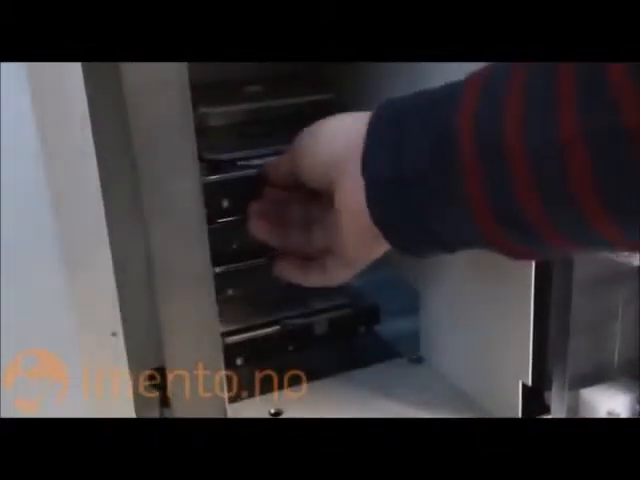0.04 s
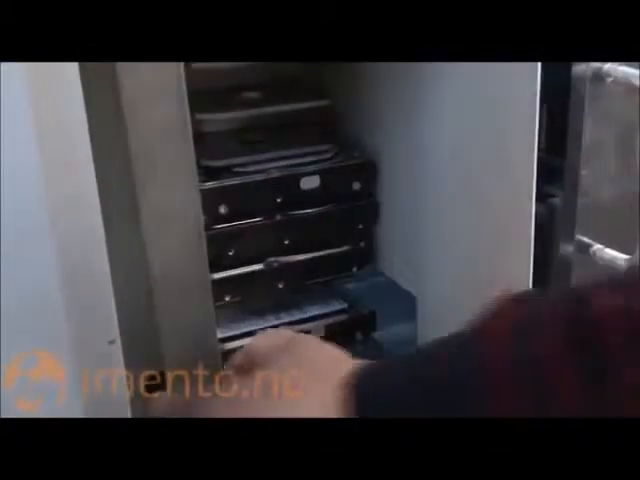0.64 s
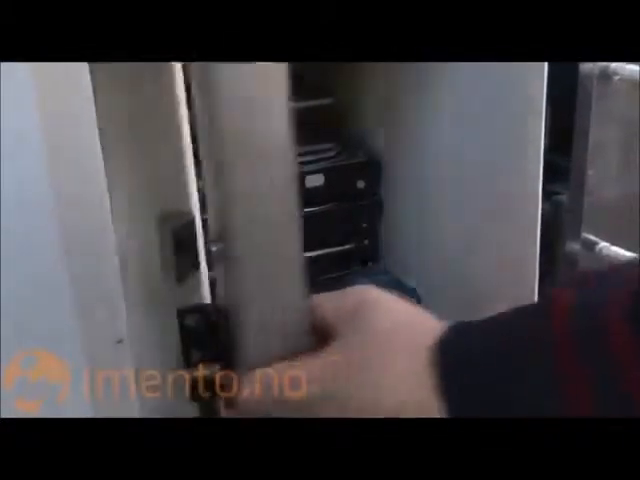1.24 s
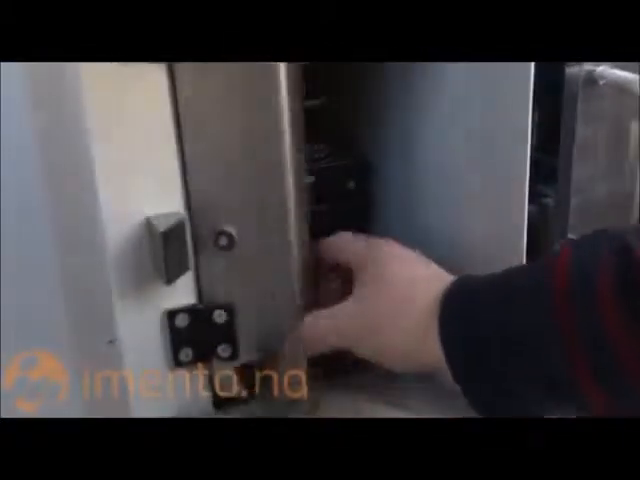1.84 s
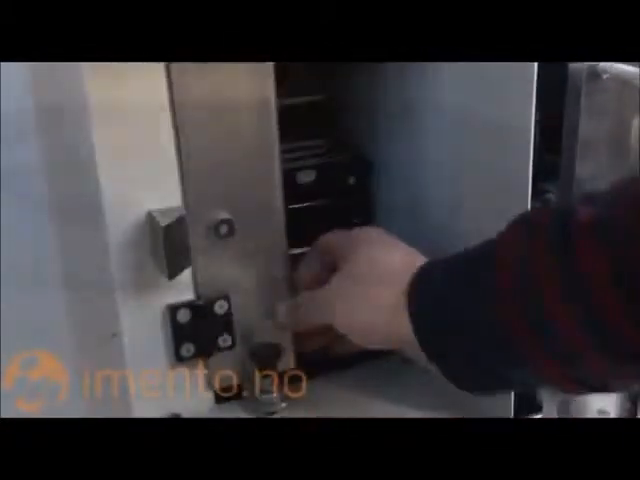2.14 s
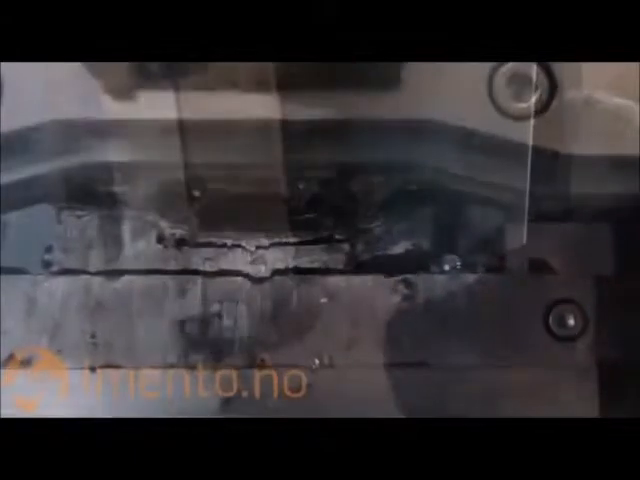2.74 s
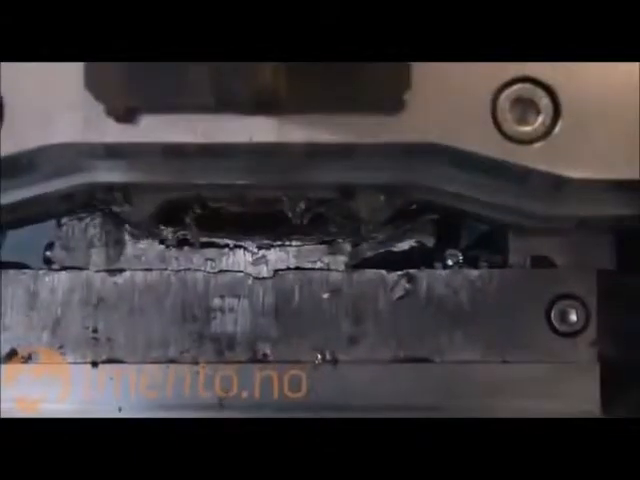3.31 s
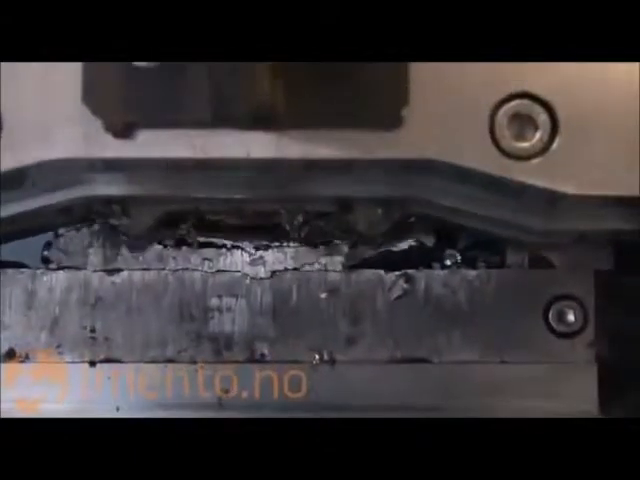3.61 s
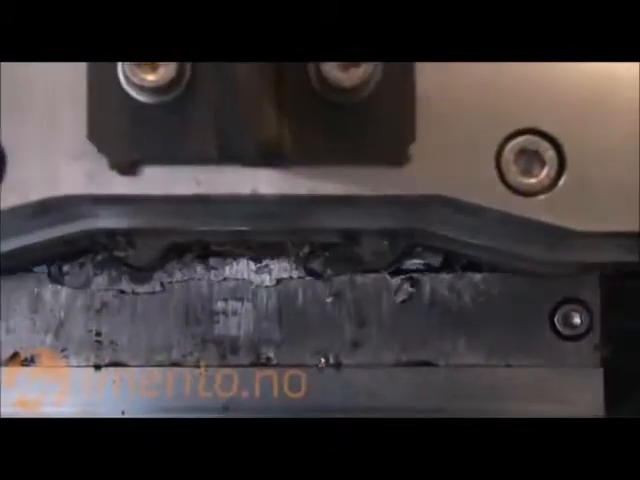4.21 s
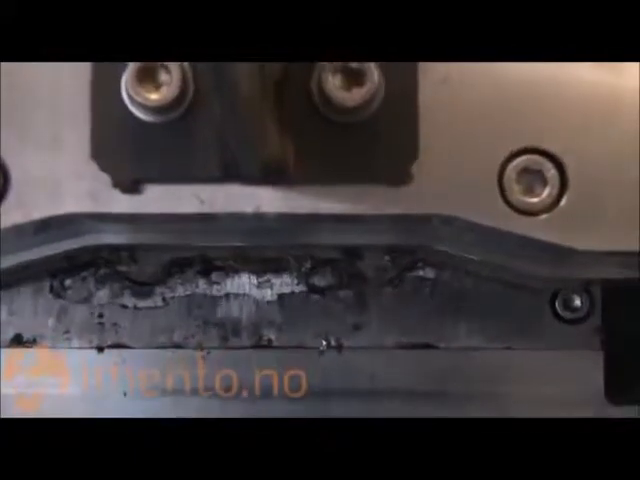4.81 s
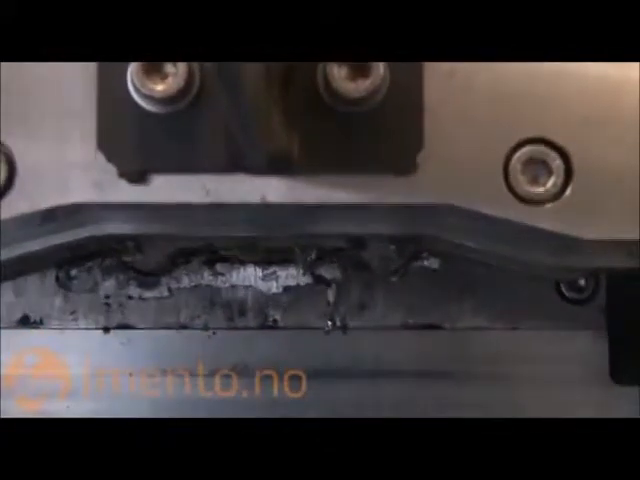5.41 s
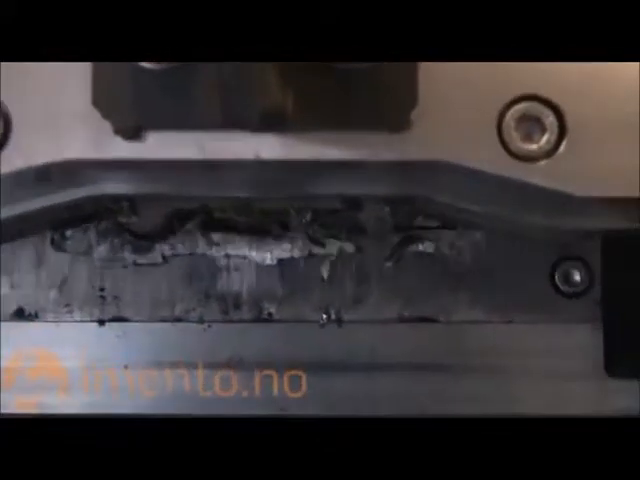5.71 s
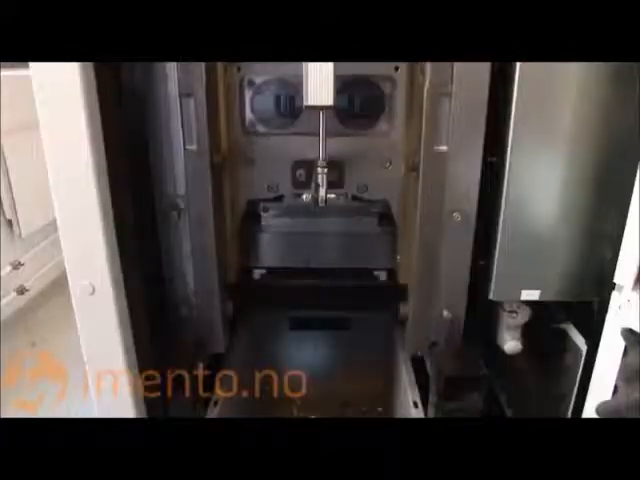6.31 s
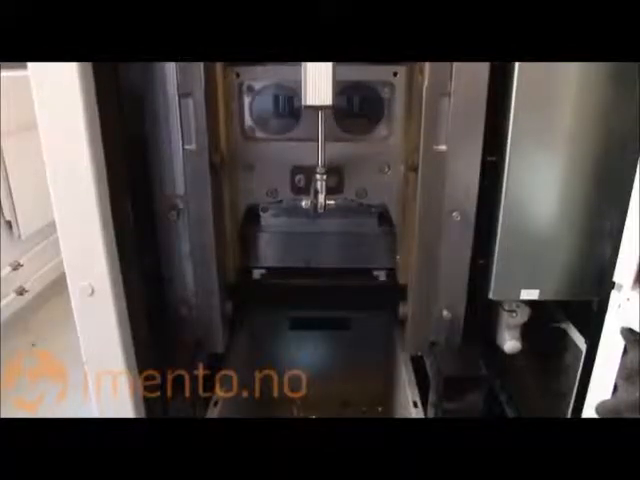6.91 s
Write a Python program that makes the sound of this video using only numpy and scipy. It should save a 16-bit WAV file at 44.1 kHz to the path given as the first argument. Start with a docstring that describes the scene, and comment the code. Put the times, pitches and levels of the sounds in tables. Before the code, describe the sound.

A metal door shuts over fan hum, then a hydraulic press whines as it crushes a hard drive with sharp cracks and a clatter.

```python
"""At a hard-drive crusher: drives are stacked in its steel cabinet and the door is shut over mains hum
and a fan; this fades out. Then, close by, the hydraulic pump whines at multiples of its piston rate and
sags under load as the ram crushes a drive. Castings crack, chips snap off, the ram bottoms out and the
wreck falls with a clatter. Impacts are decaying noise bursts, some with ringing modes."""
import sys
import numpy as np
from scipy import signal
from scipy.fft import rfft, irfft, next_fast_len
from scipy.io import wavfile

SR = 44100
rng = np.random.default_rng(int(sys.argv[2]) if len(sys.argv) > 2 else 0)


def transcribe(u):
    """Save the signal u as a 16-bit wav file named by the first command-line argument.

    u: samples, shape (n,) or (channels, n), limited to [-1, 1]; the rate is SR.
    q: integer samples, one column per channel.
    """
    v = np.clip(np.atleast_2d(u).T, -1, 1)
    q = np.round(v * 32767).astype(np.int16)
    wavfile.write(sys.argv[1], SR, q)


N = 306495
TIME = np.arange(N) / SR
RING_TIME = TIME[:SR // 2]

# Levels are relative within each table.
# idle hum: f/Hz, level/dB
HUM_TONES = [(199, -74.5), (500, -73.5), (599.6, -60.5), (700, -69.5), (1599, -72)]
# fan noise: f/Hz, density/dB
FAN_SPECTRUM = [(18, -78), (30, -36), (92, -18), (167, -17.5), (228, -7), (267, -13.5), (524, -14),
                (597, -11.5), (645, -18), (698, -9.5), (754, -18.5), (1600, -16.5), (1780, -19.5),
                (6700, -38.5), (15000, -66.5)]
# knocks of drives and door: t/s, level/dB, centre f/Hz, fall/(dB/octave), t60/s
HANDLING_KNOCKS = [(.001, -44.5, 854, 6.5, 0.54), (.026, -33.5, 1054, 15, 0.13),
                   (.078, -20.5, 1990, 11, 0.031), (1.19, -29, 6670, 8, 0.085), (2.073, -53, 4000, -2, .12),
                   (2.366, -32, 1940, 11, 0.17), (2.386, -29, 2430, 8.5, 0.074),
                   (2.466, -51, 1000, 3.5, .2)]
# modes of drive casing, latch and door panel: f/Hz, level/dB, t60/s
CASING_MODES = [(374, -8.5, 0.23), (750, -4.5, 0.24), (1518, -7, .3), (2003, -9, .2), (2263, -8.5, 0.42),
                (2778, -9.5, 0.72), (3287, -4, 0.25), (3390, -8, 0.21), (5340, -25.5, 0.44),
                (5658, -25, 0.19), (7050, -5.5, 0.071), (7240, -11, 0.066)]
LATCH_MODES = [(977, 2, 0.046), (1143, 0, 0.19), (1840, -10.5, 0.24), (2950, -21, .14), (4240, -4, 0.13),
               (5800, -4, .13), (6380, 12, 0.045), (6800, -2, 0.13), (7260, -1.5, 0.13),
               (8000, -0.5, 0.087)]
DOOR_MODES = [(358, -7.5, 0.37), (568, -0.5, 1), (783, -7, 0.54), (1455, 7, 0.19), (1500, -7.5, 0.65),
              (1770, -12, 0.59), (4180, -0.5, 0.2), (5270, -15, 0.4), (6450, -5.5, 0.26)]
# cabinet reverberation: f/Hz, t60/s
CABINET_DECAY = [(150, 0.18), (400, 0.71), (1000, 0.49), (2700, 0.28), (7000, 0.12), (14000, 0.062)]
# sleeve strokes: middle t/s, length/s, level/dB
SLEEVE_STROKES = [(.76, 0.2, -89), (1.424, 0.26, -74), (1.76, 0.28, -76), (2.054, 0.13, -73),
                  (2.35, 0.36, -68), (2.72, 0.12, -81)]
# cloth noise: f/Hz, density/dB
CLOTH_SPECTRUM = [(500, -28.5), (3500, -3.0), (6500, -1.5), (10000, -14.0), (15000, -19.0)]
# ram slips, bites, presses on, bottoms out, is released: t/s, load/0-1
RAM_LOAD = [(3.66, 0.27), (3.72, 0.07), (3.85, 0), (3.99, 0.35), (4.1, 0.64), (4.2, 0.29), (4.5, 0.28),
            (5.62, .22), (5.73, 0.89), (5.91, 0.99), (6.05, 0)]
# pressure ripple: piston-rate multiple, no-load level/dB, added part at full load/dB, load exponent
PRESSURE_RIPPLE = [(1, -63.5, -42, 0.52), (2, -51.5, -48.5, 4.7), (4, -64, -40, 0.94), (5, -56.5, -53, 1.5)]
# swells of single ripple orders: t/s, length/s, piston-rate multiple, level/dB
RIPPLE_SWELLS = [(3.454, .28, 2, -42), (3.9, 0.95, 1, -48), (3.904, 0.38, 2, -45.5), (6.44, 0.34, 1, -45.5),
                 (6.569, .18, 5, -44), (6.559, .17, 4, -48.5), (6.762, .25, 1, -52.5)]
# pump whine: piston-rate multiple, pressing level/dB, full-load level/dB, return target level/dB
WHINE_ORDERS = [(3, -6.5, -7, -11), (6, -2, -9.5, -6.5), (7, -6, -2.5, -2), (8, -6.5, -7, -3),
                (9, -1.5, 1.5, -4), (10, -9.5, -12, -11), (11, -14.5, -8, -9), (12, -18, -15, -21),
                (13, -21.5, -20, -43), (14, -24, -20, -47), (15, -31, -16, -48), (19, -43, -27, -41),
                (20, -25.5, -19, -22), (21, -33, -27, -29), (22, -42, -26, -34), (23, -33, -27, -16),
                (25, -49, -15, -5), (27, -46, -29, -20), (28, -24, -31, -14), (29, -33, -28, -27)]
# oil flow noise: f/Hz, density/dB
OIL_SPECTRUM = [(25, -24), (60, -14), (130, -1), (330, 4.5), (600, 0), (1100, -4.5), (1600, 0), (2200, -5),
                (3200, -1), (3800, -8.5), (5400, -11), (6100, -6.5), (7200, -11), (8500, -9), (9800, -17.5),
                (13000, -26), (15000, -37)]
# motor tones, many spaced by twice the mains frequency about the switching rate: f/Hz, level/dB
MOTOR_TONES = [(797, -58), (2536, -60), (3149, -57), (5701, -64.5), (5799, -61.5), (5900, -58.5),
               (6100, -65.5), (6201, -56), (6299, -73), (6401, -72), (6799, -83), (8032, -70),
               (8403, -71.5), (8624, -71)]
# frame rumble: f/Hz, density/dB
FRAME_SPECTRUM = [(40, -29), (100, -6), (138, 8.5), (170, 1.5), (230, 0), (280, -16.5), (345, 8), (450, -9),
                  (750, -13.5), (1500, -10.5), (4000, -39)]
# jolts to frame and chute: t/s, level/dB, t60/s
FRAME_JOLTS = [(3.7, -42.5, 0.5), (3.89, -45.5, 1.6), (4.853, -24.5, 0.16), (5.008, -29.5, 0.094),
               (5.64, -40.5, 0.57), (5.92, -37.5, 1.8), (6.34, -29, 1.37)]
# cracks, snaps and clanks: t/s, level/dB, centre f/Hz, fall/(dB/octave), t60/s
CRUSH_CRACKS = [(3.696, -29.5, 580, 5.5, 0.24), (3.849, -23.5, 6600, 4.5, 0.047),
                (3.879, -30, 520, 4, 0.32), (3.914, -30, 9000, 16, 0.077), (4.143, -9.5, 1200, 10.5, 0.056),
                (4.439, -17, 12010, 1.5, 0.045), (4.8525, -8, 1650, 9.5, 0.052),
                (4.863, -11.5, 1820, 6, 0.052), (5.008, -18, 1196, 10, 0.057), (5.053, -19, 3700, 7, .05),
                (5.135, -17, 2550, 7, 0.064), (5.21, -28, 3750, 4, 0.036), (5.286, -29.5, 4992, 9.5, 0.064),
                (5.637, -24, 620, 8.5, 0.11), (5.918, -14, 745, 8.5, 0.051), (5.932, -23, 850, 7, 0.24),
                (6.3316, -16, 9000, 0.5, 0.1), (6.351, -8.5, 1000, 2.5, 0.052), (6.361, -6, 970, 5.5, .06),
                (6.416, -24.5, 400, 1.2, 0.1)]
# short modes of the impacts, fragment rings and a low thump: t/s, f/Hz, level/dB, t60/s
IMPACT_MODES = [(4.144, 662, -13.5, 0.059), (4.145, 1800, -17, .035), (4.143, 2746, -20.5, 0.035),
                (4.147, 1198, -13, 0.037), (4.44, 1393, -15, 0.032), (4.443, 1665, -38, 0.21),
                (4.44, 1719, -25, 0.089), (4.442, 1860, -22.5, .05), (4.44, 4160, -24, .04),
                (4.441, 12060, -22, 0.034), (4.853, 197, -19, 0.11), (4.853, 304, -14.5, .07),
                (4.854, 1503, -17, 0.069), (4.854, 468, -20, .11), (4.853, 1970, -15, .045),
                (4.863, 646, -13.5, 0.031), (5.053, 4240, -26, 0.027), (5.637, 976, -30, 0.029),
                (5.917, 664, -14.5, 0.032), (6.332, 2505, -22.5, 0.075), (6.353, 456, -22.5, 0.17),
                (6.353, 940, -19, 0.12), (6.363, 346, -19.5, 0.13), (6.362, 542, -25.5, 0.17),
                (6.818, 1165, -23.5, 0.046), (6.818, 980, -23.5, .03), (6.819, 1238, -33, 0.15)]
# press reverberation: f/Hz, t60/s
PRESS_DECAY = [(150, 0.17), (400, 0.51), (1000, 0.23), (2700, 0.36), (7000, 0.13), (14000, 0.042)]
# left-right likeness: f/Hz, correlation/0-1
STEREO_LIKENESS = [(60, 0.93), (300, 0.95), (800, 0.6), (2500, 0.8), (4500, 0.31), (8000, 1), (12000, 1)]
# balance: f/Hz, left minus right/dB
STEREO_LEAN = [(40, 6), (330, 4), (700, 3), (1300, -1), (4400, -0.2), (12000, 0.5)]
# microphone response: f/Hz, gain/dB
MIC_RESPONSE = [(2700, 0.5), (3300, 1), (3550, -7.5), (4000, -0.5), (4300, 0), (12600, 3), (15000, -14)]

PRESSING_LOAD = 0.18  # ram moving steadily through the drive
REVERSE_S, RETRACT_END_S = 5.9, 6.34  # return stroke


def amp(db):
    """dB to gain."""
    return 10 ** (np.asarray(db) / 20)


def unit(x):
    """Scale to rms 1."""
    return x / np.sqrt(np.mean(x ** 2) + 1e-20)


def read(points, hz):
    """Interpolate over log frequency."""
    f, value = np.transpose(points)
    return np.interp(np.log(hz + 1), np.log(f + 1), value)


def curve(points):
    """Interpolate over time."""
    return np.interp(TIME, *np.transpose(points))


def ramp(start_s, length_s):
    """Linear rise, 0 to 1."""
    return np.clip((TIME - start_s) / length_s, 0, 1)


def decay(t, t60_s, rise_s=0.00034):
    """Quick rise, exponential fall."""
    return (1 - np.exp(-t / rise_s)) * amp(-60 * t / t60_s)


def add(mix, start_s, sound):
    """Mix in a stereo sound."""
    part = mix[:, max(0, round(start_s * SR)):][:, :sound.shape[1]]
    part += sound[:, :part.shape[1]]


def highpass(x, hz):
    """Second-order bass cut."""
    return signal.sosfilt(signal.butter(2, hz, "high", fs=SR, output="sos"), x)


def drift(rate_hz):
    """Slow random motion, rms 1."""
    hz = np.fft.rfftfreq(N, 1 / SR)
    return unit(irfft(rfft(rng.standard_normal(N)) * np.exp(-(hz / rate_hz) ** 2), N))


def noise(spectrum, size=N):
    """Coloured, partly correlated stereo noise, rms 1."""
    hz = np.fft.rfftfreq(next_fast_len(size), 1 / SR)
    mid, side = np.exp(2j * np.pi * rng.random((2, len(hz))))
    likeness = np.clip(read(STEREO_LIKENESS, hz), -1, 1)
    mid, side = mid * np.sqrt(1 + likeness), side * np.sqrt(1 - likeness)
    bins = np.array([mid + side, mid - side]) * amp(read(spectrum, hz))
    return unit(irfft(bins)[:, :size])


def tone(turns, spread_rad=0.81):
    """Sine of rms 1, its phase shifted between channels by spread_rad."""
    lag_rad = spread_rad * rng.choice([-.5, .5]) * np.array([[1], [-1]])
    return np.sqrt(2) * np.sin(2 * np.pi * (turns + rng.random()) + lag_rad)


def idle():
    """Mains hum and cooling fan."""
    hum = sum(amp(db + 0.35 * drift(5)) * tone(hz * TIME) for hz, db in HUM_TONES)
    return hum + amp(-61.5) * noise(FAN_SPECTRUM)


def ring(modes):
    """Sparse modes of struck metal ring out."""
    out = 0
    for hz, db, t60_s in modes:
        spread_rad = np.arccos(np.clip(read(STEREO_LIKENESS, hz), 0, 1))
        out += amp(db) * tone(hz * RING_TIME, spread_rad) * decay(RING_TIME, t60_s)
    return out


def blow(db, centre_hz, fall_db_per_oct, t60_s, round_oct=0.77, damped_above_hz=6800):
    """Dense modes of struck metal: a noise burst with one broad hump."""
    hz = np.geomspace(200, 16000, 30)
    octaves = np.log2(hz / centre_hz)
    hump_db = -fall_db_per_oct * np.hypot(octaves, round_oct) * np.where(octaves < 0, 0.92, 1)
    damping_db = 8.5 * np.maximum(np.log2(hz / damped_above_hz), 0)
    density_db = hump_db - 10 * np.log10(hz) - damping_db
    spectrum = [(45, density_db[0] - 22), *zip(hz, density_db)]
    return amp(db) * noise(spectrum, len(RING_TIME)) * decay(RING_TIME, t60_s, rise_s=0.00082)


def reflections(x, decays, onset_s=0.0064):
    """Diffuse tail; each band dies at its own rate."""
    white = noise([(50, 0.0057), (16000, 0.0009)], SR)
    hz, t, bands = signal.stft(white, SR, nperseg=256)
    tail = signal.istft(bands * amp(-60 * t / read(decays, hz)[:, None]), SR, nperseg=256)[1]
    tail *= np.clip(np.arange(tail.shape[1]) / SR / onset_s, 0, 1) ** 2
    return signal.fftconvolve(x.mean(0)[None], tail / np.linalg.norm(tail[0]), axes=1)[:, :N]


def handling():
    """A drive is set down, the latch clicks, the door shuts."""
    out = np.zeros((2, N))
    for start_s, *knock in HANDLING_KNOCKS:
        add(out, start_s, blow(*knock))
    add(out, 0, ring([(188.0, -45.5, 0.6)]))  # tray booms under the stack
    add(out, .079, amp(-39.5) * ring(CASING_MODES))
    add(out, 1.191, amp(-42.5) * ring(LATCH_MODES))
    add(out, 2.369, amp(-44.5) * ring(DOOR_MODES))
    out = highpass(out, hz=150)
    return out + amp(-10) * reflections(out, CABINET_DECAY)


def sleeve():
    """Cloth brushes the cabinet in short strokes."""
    strokes = sum(amp(db) * np.exp(-(2 * (TIME - middle_s) / length_s) ** 2)
                  for middle_s, length_s, db in SLEEVE_STROKES)
    return (amp(-90) + strokes) * amp(2.5 * drift(30)) * noise(CLOTH_SPECTRUM)


def pump(load, free_hz=299.36, sag_hz=4.4, shaft_hz=26.3):
    """Piston strokes hurry and lag once per shaft turn: a warble. Load slows and steadies them."""
    piston_hz = free_hz - sag_hz * load
    retracting = ramp(REVERSE_S, 0.23) - ramp(RETRACT_END_S, 0.13)
    swing_rad = 0.084 - 0.062 * load + 0.062 * retracting
    shaft_rad = 2 * np.pi * np.cumsum(shaft_hz * piston_hz / free_hz) / SR
    turns = np.cumsum(piston_hz + 0.12 * drift(11.3)) / SR
    turns += swing_rad * np.sin(shaft_rad) / (2 * np.pi)
    return ripple(turns, load) + whine(turns, shaft_rad, load, retracting) + oil(turns, load)


def ripple(turns, load, edge_s=0.028):
    """Low orders of the pressure pulses grow with load; now and then one swells."""
    out = np.zeros((2, N))
    for order, free_db, added_db, exponent in PRESSURE_RIPPLE:
        swells = sum(amp(db) * (ramp(start_s, edge_s) - ramp(start_s + length_s - edge_s, edge_s))
                     for start_s, length_s, multiple, db in RIPPLE_SWELLS if multiple == order)
        gain = amp(free_db) + amp(added_db) * load ** exponent + swells
        out += gain * amp(1.2 * drift(2.5)) * tone(order * turns, spread_rad=0.69)
    return out


def whine(turns, shaft_rad, load, retracting, valve_s=0.11):
    """Piston harmonics throb with the shaft; strain and valve reversal shift their balance."""
    strain = np.maximum(load - PRESSING_LOAD, 0) / (1 - PRESSING_LOAD)
    return_share = 0.62 * ramp(REVERSE_S, valve_s)
    out = np.zeros((2, N))
    for order, press_db, full_db, return_db in WHINE_ORDERS:
        colour_db = press_db + strain * (full_db - press_db) + return_share * (return_db - press_db)
        level_db = -43.5 + 3.5 * retracting + colour_db + drift(4.9)
        throb = 1 + 0.24 * np.cos(shaft_rad + rng.standard_normal())
        out += amp(level_db) * throb * tone(order * turns, spread_rad=0.86)
    return out


def oil(turns, load, free_db=-46, choke_db=-2):
    """Oil hisses, one spurt per stroke; load chokes the flow."""
    level_db = free_db + choke_db * np.minimum(load / PRESSING_LOAD, 1)
    return amp(level_db) * noise(OIL_SPECTRUM) * (1 + 0.12 * np.cos(2 * np.pi * turns))


def motor():
    """Switched current makes the windings sing."""
    waver_turns = 0.018 * drift(5.1)
    return sum(amp(db) * tone(hz * TIME + waver_turns) for hz, db in MOTOR_TONES)


def chips(load, rate_per_s=12):
    """Tiny chips tick at random as the casing yields under load."""
    size_db = np.minimum(3 * rng.exponential(1, N), 7)
    impulses = amp(size_db) * (rng.random(N) < rate_per_s / SR)
    strain = np.clip(load / PRESSING_LOAD, 0, 1)
    tick = blow(-51, centre_hz=6000, fall_db_per_oct=6, t60_s=.035)
    return signal.oaconvolve((impulses * strain)[None], tick, axes=1)[:, :N]


def rumble(floor_db=-55):
    """The frame shakes after each jolt and settles."""
    power = sum((amp(db) * decay(np.maximum(TIME - start_s, 0), t60_s, rise_s=0.01)) ** 2
                for start_s, db, t60_s in FRAME_JOLTS)
    return np.sqrt(power + amp(floor_db) ** 2) * highpass(noise(FRAME_SPECTRUM), hz=35)


def crushing(load):
    """Fractures and clanks: short bursts, some with ringing modes."""
    out = chips(load)
    for start_s, *crack in CRUSH_CRACKS:
        add(out, start_s, blow(*crack))
    for start_s, *mode in IMPACT_MODES:
        add(out, start_s, impact_ring(*mode))
    out = highpass(out, hz=227)  # keeps cracks and rings free of deep bass
    return out + amp(-16.5) * reflections(out, PRESS_DECAY)


def impact_ring(hz, db, t60_s, scatter=0.04024):
    """Short ring after an impact; modes crowd together at high pitch."""
    count = 1 + int(hz // 2000) * (hz > 3500)
    modes_hz = hz * (1 + scatter * (count > 1) * rng.uniform(-0.96, 1, count))
    return ring([(f, db, t60_s) for f in modes_hz]) / np.sqrt(count)


def return_buzz():
    """Two low tones beat near the shaft rate, fading after the valve reverses."""
    envelope = amp(-44.5) * decay(np.maximum(TIME - REVERSE_S, 0), t60_s=2.56, rise_s=0.032)
    return envelope * (tone(394 * TIME) + tone(420 * TIME) / 2)


def scene():
    """Loading fades out; after a silence the running press cuts in."""
    fade = curve([(2.35, 0.95), (3.32, 0)])
    cut_in = ramp(3.528, 0.0035)
    load = curve(RAM_LOAD)
    loading = idle() + handling() + sleeve()
    press = pump(load) + return_buzz() + motor() + crushing(load) + rumble()
    return fade * loading + cut_in * press


def record(dry, cutoff_hz=15700):
    """Microphone colour, bass leaning left, soft overload, band limit."""
    hz = np.fft.rfftfreq(N, 1 / SR)
    lean_db = read(STEREO_LEAN, hz)
    gain_db = read(MIC_RESPONSE, hz) + np.array([lean_db, -lean_db]) / 2
    coloured = irfft(rfft(dry) * amp(gain_db), N)
    limited = coloured / (1 + coloured ** 4) ** .25
    lowpass = signal.firwin(255, cutoff_hz, window=("kaiser", 9), fs=SR)
    return signal.oaconvolve(limited, lowpass[None], "same")


dry = scene()
out = record(dry)
transcribe(out)
```